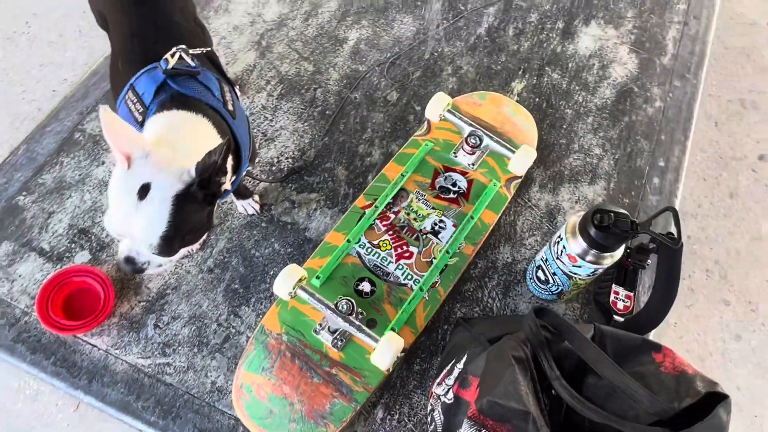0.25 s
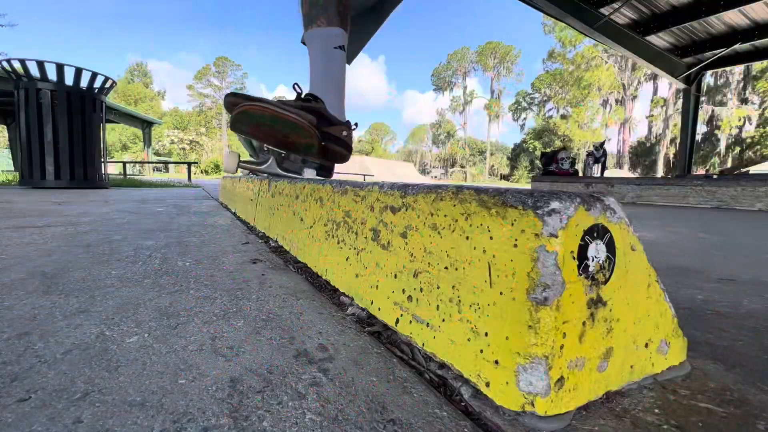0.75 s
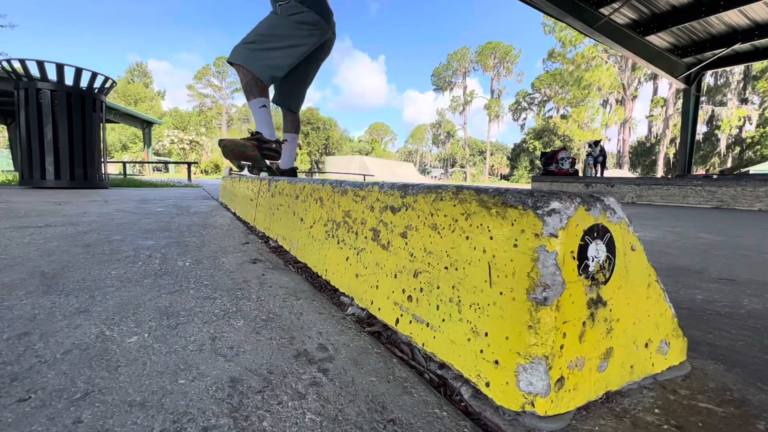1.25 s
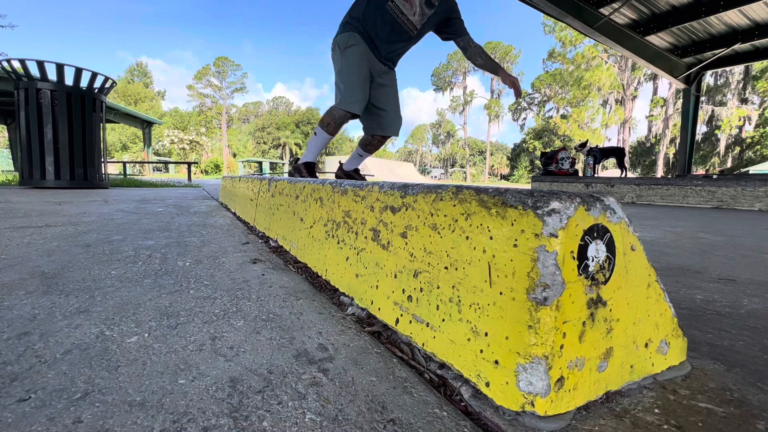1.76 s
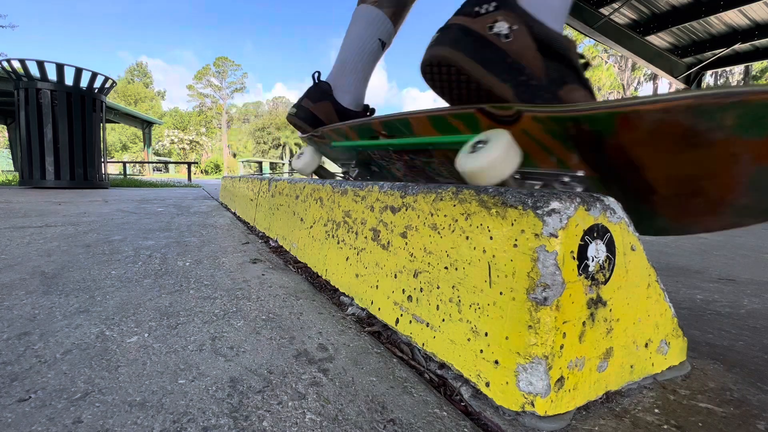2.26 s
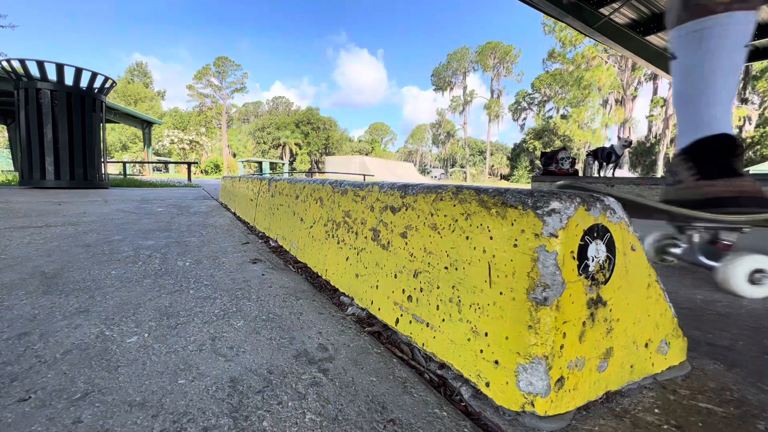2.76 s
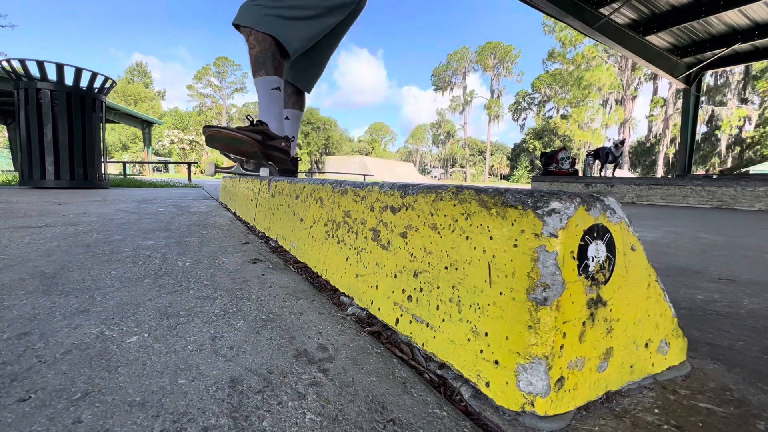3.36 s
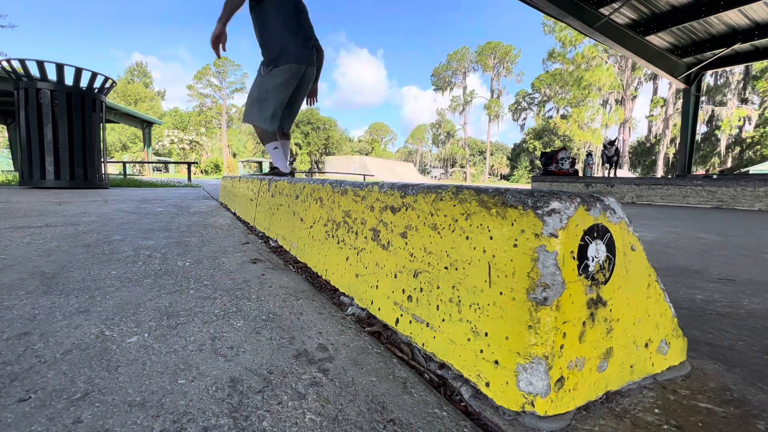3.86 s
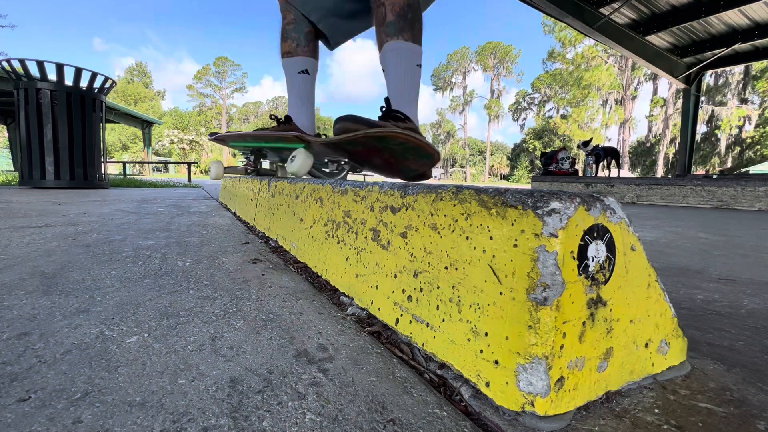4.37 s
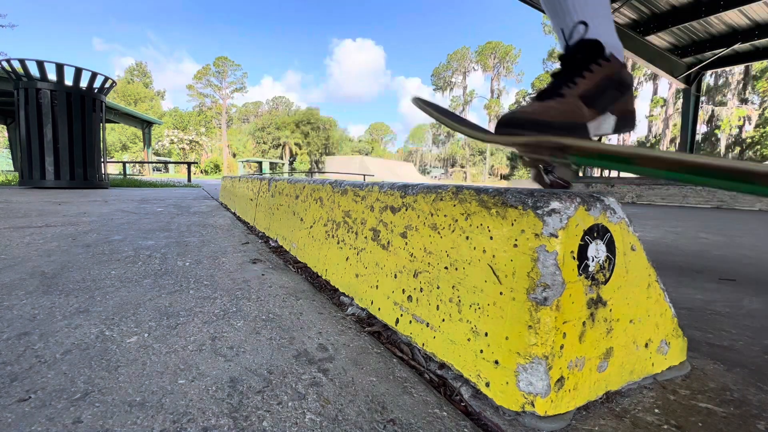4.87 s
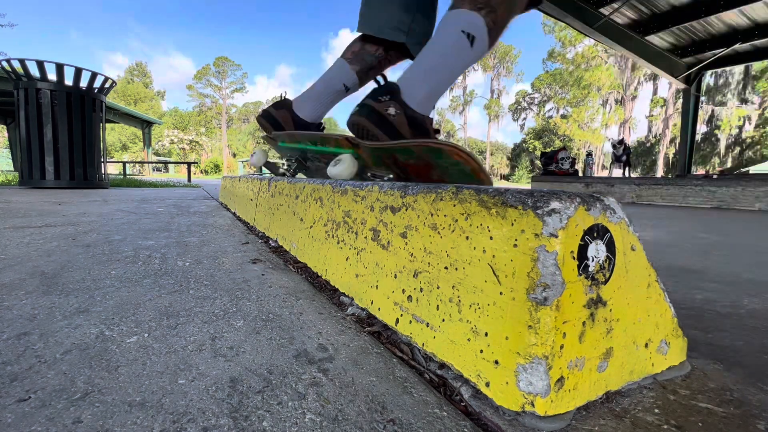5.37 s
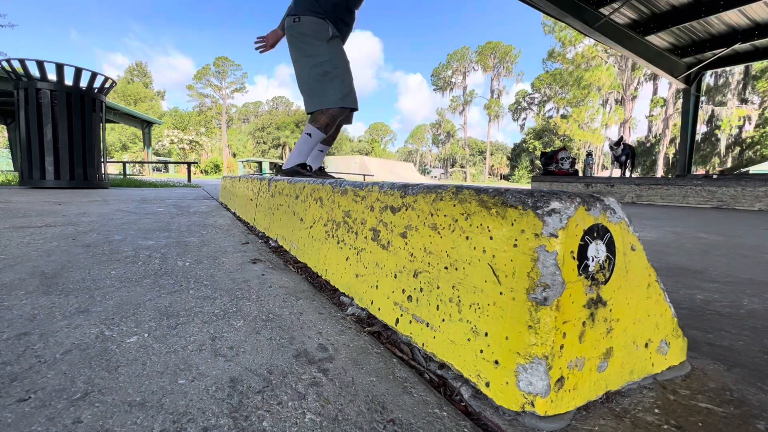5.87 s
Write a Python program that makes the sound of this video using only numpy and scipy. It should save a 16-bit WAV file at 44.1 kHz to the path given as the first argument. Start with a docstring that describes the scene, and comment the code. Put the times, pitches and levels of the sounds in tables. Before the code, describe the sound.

From 0 to 0.4 s there is only soft, lumpy breeze, thin insect hiss and a barely audible far drone. After a tiny gap, a skateboard breaks in loudly at 0.45 s with a rattle of wooden clacks and a metal snap, then gritty grinding, wheel roar near 1.1 s and a heavy clack at 1.37 s, fading by 1.7 s. A second pass starts at about 1.8 s with dense clatter, and full, rough scraping swells around 2.2 s. From 2.8 s, harder knocks and a very brief metallic squeal at 2.9 s lead into rasping. Another pass from 3.95 s cracks sharply at 4.2 s and clatters until 5 s. The next hits hard around 5.25 s, knocks again at 5.8 s and thins out; a last scrape starts after 6.07 s. Short dips to silence separate passes. Close stereo microphone, with short hollow echo from the shelter roof.

```python
"""An open park shelter: close by, a skateboard grinds and rolls along a painted concrete curb.
Random grit drives ringing modes of deck, trucks and slab, plus a bright rasp; each clack strikes the
same modes and adds a knock and a crack; metal snaps are short bursts. The roof answers with an echo and
a short ring. Before the board, a calm opening of breeze, insects and a far drone, all from shaped noise.
Six times the sound fades quickly to nothing and back."""
import sys
import numpy as np
from scipy import signal
from scipy.fft import rfft, irfft, next_fast_len
from scipy.io import wavfile
from scipy.ndimage import uniform_filter1d, minimum_filter1d

SR = 44100
rng = np.random.default_rng(int(sys.argv[2]) if len(sys.argv) > 2 else 0)


def store_wav(level_fs):
    """Save 16-bit WAV to argv[1]."""
    pcm = np.round(np.clip(np.atleast_2d(level_fs), -1, 1) * 32767)
    wavfile.write(sys.argv[1], SR, pcm.T.astype(np.int16))


N = 270333

# riding, one list a pass [t/s, level/dB, brightness/dB, left over right/dB]; close by, it is on the right
PASSES = [
    [(.45, -33, 11.5, -6.5), (.53, -23.5, 3.5, -3.5), (.62, -28.5, 7, 1), (.7, -31, 3.5, 1.5),
     (.92, -29.5, 1.5, 1), (1.144, -20, 3, 0.5), (1.24, -33.5, 5.5, -1), (1.27, -25, -2, 0),
     (1.34, -36.5, 7.5, 1), (1.52, -40, 7, -1), (1.7, -42, -13.5, -4.5)],
    [(1.76, -39, 7, -0.5), (1.862, -30, 4, -2.5), (1.878, -20.5, 8, -0.5), (2.05, -17.5, 1, 1),
     (2.2, -15.5, 2, 0), (2.32, -19.5, 0.5, -3.5), (2.48, -30, 0.5, -7), (2.63, -26.5, 8, -7.5),
     (2.68, -37, 4.5, -5), (2.72, -50, 13.5, -2)],
    [(2.79, -25, 6.5, -7.5), (2.87, -23, 4.5, -7.5), (2.99, -19, 4.5, 0), (3.11, -26.5, 2, 1.5),
     (3.31, -28, 2, 0.5), (3.54, -28, 6.5, 2.5), (3.61, -28.5, 0.5, 0), (3.71, -33, 3, 0.5),
     (3.8, -28, 6, -1.5), (3.89, -44.5, 7, 0)],
    [(3.97, -38.5, 5.5, -1), (4.108, -31, 3, -1), (4.13, -31.5, 18.5, -2), (4.18, -22, 8, -0.5),
     (4.24, -17.5, 5, 0.5), (4.4, -31, 6, 0.5), (4.59, -30.5, 6.5, 0.5), (4.76, -34, 8.5, -5),
     (4.9, -32.5, 4, -5), (4.99, -36, 11, -6.5), (5.06, -36.5, 8.5, 3)],
    [(5.13, -26.5, 7.5, -8.5), (5.25, -20.5, 2.5, -4), (5.39, -39.5, 10.5, 1.5), (5.486, -25.5, 1.5, 0.5),
     (5.55, -35.5, 4.5, 1), (5.67, -27.5, 3, 0.5), (5.775, -36.5, 7.5, 1.5), (5.84, -34, 3, 0),
     (5.92, -48, 10, 1), (6.03, -47, -12.5, -3)],
    [(6.09, -43, 7.5, -3), (6.13, -29.5, 2, -1)],
]
# weight on the slab [t/s, extra rumble level/dB]
SLAB_WEIGHT = [(.45, -1), (1.3, -2), (1.6, 0), (2.0, -4.5), (2.9, 2), (3.2, -13), (3.8, -2), (4.0, -13),
               (4.2, -14), (4.45, -8), (5.0, -1), (5.3, -2), (5.7, 2), (6.1, 5)]
# modes of the wooden deck, before damping [f/Hz, level/dB, t60/s]
DECK = [(149, 1, 0.058), (196, 3, 0.043), (235, 0.5, 0.075), (276, 3, 0.035), (371, 1.5, 0.044),
        (392.6, 2, 0.05), (427.6, 1, 0.048), (520, 2, 0.045), (545.6, 1.5, 0.042), (648.5, 3.5, 0.039),
        (662, 4.5, 0.032)]
# slab and deck flex, before damping [f/Hz, level/dB, t60/s]
THUMP = [(58, -45, 0.013), (69.8, -10.5, 0.26), (100, -1.5, 0.07), (129.2, -2.5, 0.11)]
# modes of the metal trucks, before damping [f/Hz, level/dB, t60/s]
TRUCKS = [(815, -6, 0.043), (888, 0.5, 0.041), (1012, 7.5, 0.016), (1086, 3, 0.034), (1258, -1.5, 0.031),
          (1292, -1, 0.034), (1464, -5.5, 0.013), (1677, -4.5, 0.033), (1763, -6.5, 0.018),
          (2200, 5, 0.0056), (3130, -6.5, 0.013)]
GRIT_PER_S, GRIT_SPREAD_DB = 2800, 3
FINE_PER_S, FINE_SPREAD_DB = 6000, 0.82
RUMBLE_DB, TRUCKS_DB = -12, -10.5   # re the riding level
RUMBLE_SWELLS, MEAN_DB = 0.22, -27   # extra dB per dB of level above the mean
RUMBLE_NEARS, RUMBLE_BRIGHTENS = 1, -1.12   # dB per dB of lean to the right, and of brightness
SHAKE_RUMBLE_DB = 13   # re the thump of the blow
RUB_TOP_HZ = 1893


def grind():
    """Grit under trucks and wheels drives the deck, the slab and the trucks, with roar and rasp on top."""
    level_db, bright_db, pan_db = riding_curves()
    _, peak_db, _, thump_db, blow_db, _ = np.transpose(CLACKS)
    rumble_db = level_db + RUMBLE_DB + in_time(SLAB_WEIGHT)[0]
    rumble_db += RUMBLE_SWELLS * (level_db - MEAN_DB)
    rumble_db += RUMBLE_BRIGHTENS * bright_db - RUMBLE_NEARS * pan_db
    grains = grit(GRIT_PER_S, GRIT_SPREAD_DB)
    fine = grit(FINE_PER_S, FINE_SPREAD_DB)
    # rubbing is too soft a contact to wake the highest truck modes
    soft = signal.sosfilt(signal.butter(8, RUB_TOP_HZ, fs=SR, output="sos"), grains)

    deck_gain = both(level_db, shaking(peak_db))
    rumble_gain = both(rumble_db, shaking(peak_db + thump_db + SHAKE_RUMBLE_DB))
    trucks_gain = both(level_db + TRUCKS_DB + bright_db, shaking(peak_db + blow_db))
    mix = deck_gain * body(grains, DECK, damping=0.68)
    mix += rumble_gain * body(grains, THUMP, damping=0.94)
    mix += trucks_gain * body(soft, TRUCKS, damping=0.49)
    mix += roar(soft) + rasp(grains, fine)
    return to_ports(from_db(0.1 * drift(22.0)) * mix, pan_db)


# hard wheels on coarse concrete [t/s, relative level/dB]
ROAR = [(.45, -61), (.62, -41), (.85, -40.5), (.95, -33.5), (1.1, -30.5), (1.2, -42), (1.37, -48),
        (1.56, -69), (1.84, -64), (1.9, -42), (2.14, -30), (2.32, -44), (2.66, -63), (2.89, -45),
        (2.98, -42.5), (3.39, -35), (3.68, -47), (3.85, -51), (4.1, -55), (4.15, -35), (4.2, -60),
        (4.4, -40), (4.83, -45), (5.12, -43), (5.3, -43), (5.76, -51), (5.89, -67), (6.13, -64)]
ROAR_HZ, ROAR_T60_S, ROAR_DB = 1680, 0.0031, 2


def roar(soft):
    """Hard wheels on coarse concrete: softened grit through one short, broad resonance."""
    return from_db(ROAR_DB + in_time(ROAR)[0]) * rms_one(ring(soft, ROAR_HZ, ROAR_T60_S))


# spectrum of the lower rasp [f/Hz, relative level/dB]
SCRAPE = [(1000, -73), (1700, -8.5), (2610, -2.5), (3900, -10), (5500, -9.5), (7150, -13.5), (12100, -120)]
# spectrum of the upper rasp [f/Hz, relative level/dB]
HISS = [(4500, 15.5), (6000, -4.5), (9000, 26), (11200, 10.5), (13000, 18.5), (15500, 20.5), (16200, 24)]
SCRAPE_DB, HISS_DB = -25.5, -26.5   # re the riding level
SCRAPE_SWELLS, HISS_SWELLS = 0.11, 0.033   # extra dB per dB of level above the mean
SCRAPE_BRIGHTENS, HISS_BRIGHTENS = 1.47, 0.31   # dB per dB of brightness
SHAKE_HISS_DB = 11.5   # re the crack of the blow


def rasp(grains, fine):
    """Grains shaped into a scrape and a hiss, both flickering and stirred up by the blows."""
    level_db, bright_db, _ = riding_curves()
    _, peak_db, _, _, _, crack_db = np.transpose(CLACKS)
    swell_db = level_db - MEAN_DB
    scrape_db = level_db + SCRAPE_DB + SCRAPE_SWELLS * swell_db + SCRAPE_BRIGHTENS * bright_db
    hiss_db = level_db + HISS_DB + HISS_SWELLS * swell_db + HISS_BRIGHTENS * bright_db
    stirred_db = shaking(peak_db + crack_db + SHAKE_HISS_DB)
    scrape_gain = both(scrape_db, stirred_db) * from_db(0.21 * drift(44))
    hiss_gain = both(hiss_db, stirred_db) * from_db(1.6 * drift(54))
    return scrape_gain * colour(grains + 3.4 * fine, SCRAPE) + hiss_gain * colour(fine, HISS)


def grit(per_s, spread_db):
    """Two unrelated trains of grains with uneven sizes, clumped alike."""
    born = rng.random((2, N)) < per_s * from_db(2.5 * drift(25)) / SR
    sizes = from_db(spread_db * np.minimum(rng.exponential(1, (2, N)), 5))
    return born * sizes * rng.choice([-1, 1], (2, N))


WANDER_DB, WANDER_S = 2.5, 0.03   # spread of the wander, time between its random points


def body(force, modes, damping):
    """Modes rubbed by one force and damped by contact; shifting weight lets each swell and sink; rms 1."""
    t, knots = np.arange(N) / SR / WANDER_S, np.arange(1000)
    total = 0
    for k, (hz, db, t60) in enumerate(modes):
        wander = np.interp(t, knots, from_db(WANDER_DB * rng.standard_normal(len(knots))))
        total = total + (-1) ** k * from_db(db) * ring(force * wander, hz, damping * t60)
    return rms_one(total)


SHAKE_DB, SHAKE_DB_PER_S = -21.5, 219   # a blow leaves the board rattling: start re the given level, fade


def shaking(db):
    """Level in dB left by the blows: each starts at its strength and fades at a steady rate."""
    start = np.full(N, -200.)
    start[np.round(np.array(CLACKS)[:, 0] * SR).astype(int)] = db + SHAKE_DB
    slope = SHAKE_DB_PER_S * np.arange(N) / SR
    return np.maximum.accumulate(start + slope) - slope


# blows of wheels and tail [t/s, drive level/dB, pitch f/Hz, then re the drive: thump level/dB,
# trucks level/dB, crack level/dB]
CLACKS = [(0.443, -17, 380, -8, -25, -28), (0.46, -4, 240, -21, -12.5, -26.5),
          (0.483, -8, 530, -16, -17, -22), (0.502, -4, 236, -6, -11.5, -22.5),
          (0.523, -3, 540, -16, -8, -22), (0.532, -6.5, 565, -16, -13.5, -28),
          (0.54, -7, 490, -15, -14, -24.5), (0.549, -8, 620, -7, -30, -42),
          (0.572, -1, 595, -22, -10.5, -22), (0.59, -5, 593, -15, -18, -40),
          (0.786, -23.5, 406, -31, -4, -20), (0.95, -23, 1650, -24, -5, -26),
          (1.108, -13.5, 510, -27, -6, -44), (1.132, -14, 242, -4, -12, -21),
          (1.158, -5.5, 486, -7.5, -17, -31), (1.255, -9.5, 448, -7, -14.5, -27.5),
          (1.354, -3, 665, -13, -10.5, -29.5), (1.37, 7, 478, -7.5, -11, -32.5),
          (1.387, -2.5, 530, -14, -10, -32), (1.871, -4, 330, -26, -8.5, -30),
          (1.882, -11.5, 710, -26, -15, -30), (1.89, -10.5, 231, -20, 0.5, -18),
          (1.912, -6, 1310, -24, -11, -26), (1.927, -9, 600, -24, -11, -30),
          (1.9595, 1.5, 810, -16, -12, -22.5), (1.982, -3.5, 520, -27, -9, -21),
          (2.006, -11, 497, -22, -4, -19.5), (2.021, -7, 910, -22, -13, -25),
          (2.038, -13, 590, -22, -10, -25), (2.067, -8.5, 350, -2, -29, -26),
          (2.16, -13.5, 890, -23, -8, -27), (2.189, -8, 336, -21, -17, -22),
          (2.234, -15, 477, -20, -2.5, -16), (2.289, -6.5, 504, -17, -20, -46),
          (2.32, -6.5, 223, -24, -13, -28.5), (2.347, -11.5, 293, -5, -16, -22),
          (2.409, -16.5, 180, 8.5, -17, -14), (2.437, -9.5, 187, -1.5, -32, -21),
          (2.528, -12, 286, 2.5, -29, -21), (2.574, -14, 500, -20, -15, -24),
          (2.582, -14.5, 940, -20, -13, -19), (2.591, -11.5, 430, -24, -12, -17),
          (2.631, -11, 263, 0.5, -17, -22.5), (2.648, -4.5, 195, -6, -34, -34),
          (2.8603, -10, 1140, -20, -18, -28), (2.865, -6.5, 236, -4, -13.5, -31),
          (2.88, -2, 430, -17, -13, -22.5), (2.896, -19, 1500, -20, -6, -17),
          (2.92, -4, 270, -21, -14, -26), (2.937, 2.5, 530, -26, -14, -32), (2.957, 2.5, 272, -8, -30, -32),
          (2.978, 0, 660, -20, -14, -24.5), (2.996, -2, 400, -20, -13, -36),
          (3.166, -13, 183, -27, -10, -25.5), (3.427, -11, 259, -11, -14.5, -31),
          (3.492, -8.5, 550, -25, -8.5, -27.5), (3.622, -12.5, 262, -30, -11, -25),
          (3.734, 0.5, 1100, -20, -17.5, -31.5), (3.75, -3, 196, -26, -12.5, -33.5),
          (3.817, -9.5, 446, -7.5, -26, -40), (4.114, -8.5, 310, -29, -5.5, -40),
          (4.13, -7.5, 247, -26, -9, -44), (4.179, -13, 497, -25, -19, -25),
          (4.197, 4.5, 543, -35, -16, -26.5), (4.2227, -2.5, 610, -29, -14, -35),
          (4.241, -5, 200, -27, -14.5, -29), (4.261, -9, 370, -25, -24, -28),
          (4.336, -12, 388, -18, -5, -24), (4.444, -11.5, 600, -14, -20, -31),
          (4.485, -11.5, 188, -25, -16.5, -23), (4.557, -12, 425, -21, -8.5, -19),
          (4.602, 0, 230, -41, -19, -27.5), (4.655, -12, 197, -23, -6.5, -16),
          (4.679, -22, 684, -15, -0.5, -12), (4.712, -4, 554, -7, -12, -25),
          (4.756, 1, 204, -23, -14.5, -31.5), (4.84, -14, 186, -28, -7.5, -18),
          (4.88, -23.5, 398, -29, -7, -6.5), (4.894, -24, 403, -29, -4, -8),
          (4.93, -15, 235, -23, -16, -20), (4.962, -21.5, 900, -17, -6.5, -6.5),
          (4.971, -7.5, 620, -11, -4, -22), (4.99, -10.5, 520, -5, -6, -25),
          (5.002, -10, 250, -13, -21, -30), (5.215, -6, 477, -7, -23, -16.5),
          (5.2475, 2, 300, -7, -22, -36), (5.264, -10, 230, -20, -26, -36), (5.279, -2, 300, -18, -25, -38),
          (5.2736, -1.5, 610, -7.5, -17, -24), (5.297, -6.5, 332, -24, -16, -36),
          (5.3031, -4, 600, -22, -15.5, -28), (5.349, -7.5, 318, -6, -10, -26),
          (5.433, -11.5, 440, -20, -23, -26), (5.738, -24, 1060, 1, -10, -29),
          (5.7883, -0.5, 707, -29, -11.5, -36.5), (5.7925, -3.5, 423, -24, -27, -29.5),
          (5.803, -7.5, 223, -7.5, -17, -33), (5.811, -10.5, 334, -12, -19, -42)]
CONTACT_S, CONTACT_SPREAD_S = 0.001536, 0.0035   # build-up before the modes speak, spread of their starts
SOFT_ABOVE = 9.8   # overtones fade above this multiple of a mode
DECK_BLOW_DB, TRUCK_BLOW_DB, THUMP_BLOW_DB = -17.5, -2.5, -16.0
CRUNCH_S, CRUNCH_SHORTENS = 0.0068, 0.15   # fade at 0 dB drive; dB of time shorter per dB of drive
CRUNCH_DB = -29   # noise driving the modes
CRACK_RISE_S = 0.00011
BITE_DB, BITE_FOLLOWS_TRUCKS = 1.5, 0.29   # the lower, scraping part of the crack
KNOCK_DB, KNOCK_CYCLES = -7, 2.42   # re the drive; cycles to fade
KNOCK_SAGS = 0.13   # depth of the phase sag as the knock fades


def clacks():
    """Each blow strikes every mode, most those near its pitch, crunches on and adds a knock and a crack."""
    s, peak_db, pitch_hz, thump_db, trucks_db, crack_db = np.transpose(CLACKS)
    modes = DECK + TRUCKS + THUMP
    part_db = [DECK_BLOW_DB] * len(DECK)
    part_db += [trucks_db + TRUCK_BLOW_DB] * len(TRUCKS)
    part_db += [thump_db + THUMP_BLOW_DB] * len(THUMP)
    at = np.round((s + CONTACT_S) * SR).astype(int)
    after = np.arange(round(.07 * SR))
    spans = at[:, None] + after
    crunch_s = np.clip(CRUNCH_S * from_db(-CRUNCH_SHORTENS * peak_db), .001, .03)
    fades = np.exp(-after / (crunch_s[:, None] * SR))
    luck = rng.random((len(s), 5, len(modes)))
    white = rng.standard_normal((2, N))

    out = np.zeros((2, N))
    for k, (hz, db, t60) in enumerate(modes):
        near_db = 10 * np.exp(-(np.log(hz / pitch_hz) / 0.13) ** 2)
        level = from_db(peak_db + part_db[k] + db + near_db)
        # the contact spreads over a few milliseconds, so the modes start one after another
        start = at + (luck[:, 4, k] * CONTACT_SPREAD_S * SR).astype(int)
        uneven = from_db(-6 * luck[:, :2, k].T)
        sign = np.sign(luck[:, 2:4, k].T - .5)
        force = np.zeros((2, N))
        force[:, start] = level * uneven * sign
        crunch = lay(spans, level[:, None] * fades)
        force = force + from_db(CRUNCH_DB) * crunch * white
        soft = np.exp(-2 * np.pi * SOFT_ABOVE * hz / SR)
        out += ring(signal.lfilter([1 - soft], [1, -soft], force), hz, 0.43 * t60)

    rise = 1 - np.exp(-after / (CRACK_RISE_S * SR))
    bite_db = peak_db + crack_db + BITE_DB + BITE_FOLLOWS_TRUCKS * (trucks_db - crack_db)
    bite = lay(spans, from_db(bite_db)[:, None] * fades ** 2.27 * rise)
    spark_fade = fades ** 2.0 + 0.34 * fades
    spark = lay(spans, from_db(peak_db + crack_db - 3)[:, None] * spark_fade * rise)
    turns = pitch_hz[:, None] * after / SR
    sagging_turns = turns * (1 - KNOCK_SAGS * np.tanh(turns / KNOCK_CYCLES))
    knock_fade = from_db(peak_db + KNOCK_DB)[:, None] * np.exp(-turns / KNOCK_CYCLES)
    knock = lay(spans, knock_fade * np.sin(2 * np.pi * sagging_turns))
    out += knock + spark * colour(white, HISS) + bite * colour(white, SCRAPE)
    return to_ports(out, riding_curves()[-1])


# bare metal against the stone edge [t/s, burst level/dB, length/s, ringing f/Hz]
SNAPS = [(0.573, -3, 0.0018, 2500), (1.11, -23, 0.0016, 1600), (1.353, -32, 0.0016, 1470),
         (1.885, -18, 0.002, 1400), (1.965, -21, 0.0018, 2470), (1.968, -16, 0.0018, 1460),
         (2.352, -26, 0.002, 2350), (2.4233, -22, 0.0016, 2480), (2.5666, -24, 0.002, 2440),
         (2.6298, -14.5, 0.0019, 3460), (2.861, -21, 0.0026, 1900), (2.917, -16.5, 0.002, 1660),
         (2.956, -15, 0.0029, 1390), (2.9796, -4, 0.00099, 3200), (3.729, -27, 0.0023, 1400),
         (3.754, -16.5, 0.0022, 1810), (4.115, -13.5, 0.0021, 1470), (4.1305, -15.5, 0.003, 1960),
         (4.146, -22, 0.0027, 1700), (4.15, -20, 0.003, 1610), (4.322, -22, 0.0018, 1680),
         (4.599, -20.5, 0.0021, 1620), (4.717, -15, 0.0012, 1530), (4.929, -17, 0.0017, 1950),
         (4.972, -6.5, 0.0015, 2020), (5.22, -14, 0.0013, 1860), (5.236, -21, 0.002, 1300),
         (5.2745, -13, 0.0013, 2000) , (5.3, -20, 0.002, 1140), (5.3512, -22.5, 0.0016, 1640)]
# spectrum of a snap [f/Hz, relative level/dB]
SNAP = [(900, -47), (1500, 9.5), (2800, 7), (4500, -1.5), (7000, -4), (9000, -4.5), (12000, -14.5),
        (16000, -53)]
SNAP_RISE_S = 0.00041
SNAP_RING_DB, SNAP_RING_LASTS = -4, 2.2   # re the burst: level, length


def snaps():
    """Metal meets stone: short bright noise bursts, each with a brief sine ring."""
    s, peak_db, length_s, pitch_hz = np.transpose(SNAPS)[..., None]
    after = np.arange(round(.03 * SR)) / SR
    at = np.round(s * SR).astype(int) + np.arange(len(after))
    rise = from_db(peak_db) * (1 - np.exp(-after / SNAP_RISE_S))
    length_s = np.clip(length_s, .0005, .008)
    burst = lay(at, rise * np.exp(-after / length_s))
    ring_fade = np.exp(-after / (SNAP_RING_LASTS * length_s))
    ringing = lay(at, rise * ring_fade * np.sin(2 * np.pi * pitch_hz * after))
    out = burst * colour(rng.standard_normal((2, N)), SNAP) + from_db(SNAP_RING_DB) * ringing
    return to_ports(out, riding_curves()[-1])


SQUEAL_S, SQUEAL_HZ, SQUEAL_DB = 2.909, 1800, -14
SQUEAL_RISE_S, SQUEAL_FADE_S = .004, 0.0055


def squeal():
    """A truck sings briefly as it slips: one sine under a bell-shaped swell, unsteady in level."""
    t = np.arange(N) / SR - SQUEAL_S
    swell = np.exp(-.5 * (t / np.where(t < 0, SQUEAL_RISE_S, SQUEAL_FADE_S)) ** 2)
    quarter_apart = np.array([[0], [.25]])   # cycles between middle and side
    tone = np.sin(2 * np.pi * (SQUEAL_HZ * t + quarter_apart))
    return to_ports(from_db(SQUEAL_DB + 1.8 * drift(150)) * swell * tone, riding_curves()[-1])


# hollow bands of the shelter's tail [f/Hz, width/Hz, lift level/dB]
ROOF_RINGS = [(510, 64, 12.5), (1330, 170, 4.5)]
ROOF_S, ROOF_DB = .0152, -12
SHELTER_T60_S, SHELTER_DULL_HZ, SHELTER_DB = 0.57, 4770, -25.5


def shelter(x):
    """One early echo off the roof, then fourteen feedback delays a side, duller on every round."""
    size = next_fast_len(N + SR)
    w = 2 * np.pi * np.arange(size // 2 + 1) / size
    hz_axis = w * SR / (2 * np.pi)
    dull = np.exp(-2 * np.pi * SHELTER_DULL_HZ / SR)
    wall = (1 - dull) / (1 - dull * np.exp(-1j * w))
    hollow = from_db(sum(db / (1 + ((hz_axis - hz) / width_hz) ** 2) for hz, width_hz, db in ROOF_RINGS))
    roof = from_db(ROOF_DB) * np.exp(-1j * w * ROOF_S * SR) * wall
    out = []
    for side, lags in zip(x, rng.uniform(.02, .055, (2, 14)) * SR):
        tail = 0
        for k, lag in enumerate(lags):
            loop = from_db(-60 * lag / SR / SHELTER_T60_S) * wall * np.exp(-1j * w * lag)
            tail = tail + (-1) ** k * loop / (1 - loop)
        response = roof + from_db(SHELTER_DB) * hollow * tail
        out.append(irfft(rfft(side, size) * response, size)[:N])
    return np.array(out)


# spectrum of the park's far wash [f/Hz, relative level/dB]
PARK = [(150, 13.5), (500, 6), (1400, 1.5), (2500, -15.5), (6500, -30), (8500, -8), (10500, -20.5),
        (15500, -101)]
PARK_DB = -47.5


def park():
    """The steady far wash of the park around the shelter: shaped noise."""
    return to_ports(from_db(PARK_DB) * colour(rng.standard_normal((2, N)), PARK), 0.65)


# breeze in the calm opening [t/s, level/dB]
GUSTS = [(0, -46), (.07, -39), (.14, -42), (.18, -46.5), (.43, -44.5)]
# spectrum of the breeze [f/Hz, relative level/dB]
BREEZE = [(15, -43), (25, -3), (76, 0), (120, -8.5), (400, -24.5), (863, -48), (2000, -64)]


def breeze(white):
    """Lumpy breeze on the ports: low noise whose level wanders quickly."""
    return from_db(in_time(GUSTS)[0] + 4.8 * drift(14.0)) * colour(white, BREEZE)


INSECTS_HZ, INSECTS_T60_S, INSECTS_DB = 8430, 0.005, -60


def insects(white):
    """A narrow high band: noise through the same resonance twice, flickering slightly."""
    band = ring(ring(white, INSECTS_HZ, INSECTS_T60_S), INSECTS_HZ, INSECTS_T60_S)
    return from_db(INSECTS_DB + 0.82 * drift(44)) * rms_one(band)


# far drone [t/s, level/dB]
DRONE = [(0, -69), (.15, -65), (.25, -63), (.35, -67), (.43, -70)]
DRONE_HZ, DRONE_T60_S = 1740, 0.0069


def drone(white):
    """A far drone: noise through the same resonance twice, slowly rising and sinking."""
    band = ring(ring(white, DRONE_HZ, DRONE_T60_S), DRONE_HZ, DRONE_T60_S)
    return from_db(in_time(DRONE)[0]) * rms_one(band)


# spectrum of the opening's still air [f/Hz, relative level/dB]
AIR = [(500, -7), (900, -6), (2200, -6), (3400, -19), (6700, -20), (8000, 0), (9300, -2), (11900, -5),
       (14800, -19), (16000, -25)]
AIR_DB = -63


def calm():
    """Breeze, still air, drone and insects from one noise, until the first join."""
    white = rng.standard_normal((2, N))
    air = from_db(AIR_DB) * colour(white, AIR)
    mix = breeze(white) + air + drone(white) + insects(white)
    return to_ports(mix, 4.4) * (np.arange(N) / SR < JOINS[0][0])


# moments of silence between passes [t/s, fade-out/s, fade-in/s]
JOINS = [(0.436, 0.019, 0.018), (1.735, 0.044, 0.025), (2.769, 0.049, 0.051), (3.938, 0.036, 0.025),
         (5.099, 0.047, 0.074), (6.07, 0.044, 0.019)]


def joins():
    """Gain that fades to nothing and back at each join."""
    t, gain = np.arange(N) / SR, np.ones(N)
    for s, out_s, in_s in JOINS:
        gain = gain * np.clip(np.maximum((s - t) / out_s, (t - s) / in_s), 0, 1)
    return gain


WIDE_ABOVE_HZ, WIDE_DB, BASS_WIDE_DB = 548, 1.5, -12.5


def to_ports(pair, pan_db):
    """Long waves reach both ports nearly alike; short ones also arrive by other paths."""
    middle, other = pair
    high = signal.sosfilt(signal.butter(2, WIDE_ABOVE_HZ, "high", fs=SR, output="sos"), other)
    bass = signal.sosfilt(signal.butter(2, WIDE_ABOVE_HZ / 2, fs=SR, output="sos"), other)
    side = from_db(WIDE_DB) * high + from_db(BASS_WIDE_DB) * bass
    lean = from_db(pan_db / 2)
    return np.array([(middle + side) * lean, (middle - side) / lean])


def ring(force, hz, t60):
    """A resonance: a unit click sets a sine of height about 1 ringing."""
    r, w = from_db(-60 / (t60 * SR)), 2 * np.pi * hz / SR
    return signal.lfilter([0, np.sin(w)], [1, -2 * r * np.cos(w), r * r], force + 1e-18)


def colour(x, points):
    """Give a spectrum, read on a log-frequency axis, to a steady excitation; rms 1."""
    size = next_fast_len(N)
    hz = np.maximum(np.arange(size // 2 + 1) * SR / size, 1)
    p = np.array(points)
    gain = from_db(np.interp(np.log(hz), np.log(p[:, 0]), p[:, 1], left=-60, right=-60))
    return rms_one(irfft(rfft(x, size) * gain, size)[..., :N])


def drift(rate_hz):
    """Slow random wandering of rms 1: noise through two equal one-pole smoothers."""
    r = np.exp(-2 * np.pi * rate_hz / SR)
    return rms_one(signal.lfilter([1], [1, -2 * r, r * r], rng.standard_normal(N + SR))[SR:])


def lay(at, shapes):
    """Sum short shapes into one track at their sample positions."""
    return np.bincount(at.ravel(), shapes.ravel(), minlength=N)[:N]


def in_time(rows):
    """Each column of a curve table, sample by sample."""
    s, *columns = np.transpose(rows)
    return [np.interp(np.arange(N) / SR, s, c) for c in columns]


def riding_curves():
    """Level, brightness and left-right lean of the board, sample by sample."""
    return in_time(np.vstack(PASSES))


def both(a_db, b_db):
    """Gain of two unrelated excitations together."""
    return np.hypot(from_db(a_db), from_db(b_db))


def from_db(db):
    """Decibels to gain."""
    return 10 ** (np.asarray(db) / 20)


def rms_one(x):
    """Scale to unit power."""
    return x / np.sqrt(np.mean(x ** 2) + 1e-20)


def scene():
    """Board, its echoes, the park and the calm opening, faded at the joins."""
    riding = np.arange(N) / SR > JOINS[0][0]
    hits = clacks() + snaps() + squeal()
    rolling = grind() * riding
    echoes = shelter(hits + 0.15 * rolling)
    return (rolling + hits + echoes + park() * riding + calm()) * joins()


LIMIT_DB, RELEASE_DB_PER_S = 0, 147


def limiter(x):
    """Gain drops just ahead of peaks over the limit and recovers at a steady rate."""
    over_db = np.maximum(20 * np.log10(np.abs(x).max(axis=0) + 1e-9) - LIMIT_DB, 0)
    slope = RELEASE_DB_PER_S * np.arange(N) / SR
    held_db = np.maximum.accumulate(over_db + slope) - slope
    ahead_db = -minimum_filter1d(-held_db, size=65)
    return x * from_db(-.95 * uniform_filter1d(ahead_db, size=33))


MIC_LOW_HZ, CUTOFF_HZ = 68, 16600


def record(dry):
    """The microphone drops the deep bass, a limiter and a clip hold the peaks, the top is cut."""
    thin = signal.sosfilt(signal.butter(2, MIC_LOW_HZ, "high", fs=SR, output="sos"), dry)
    held = np.clip(limiter(thin), -.95, .95)
    return signal.sosfilt(signal.cheby2(12, 70, CUTOFF_HZ, fs=SR, output="sos"), held)


dry = scene()
out = record(dry)
store_wav(out)
```